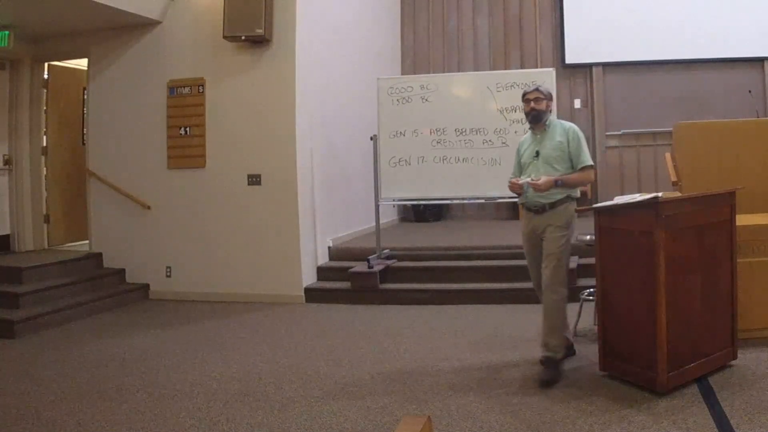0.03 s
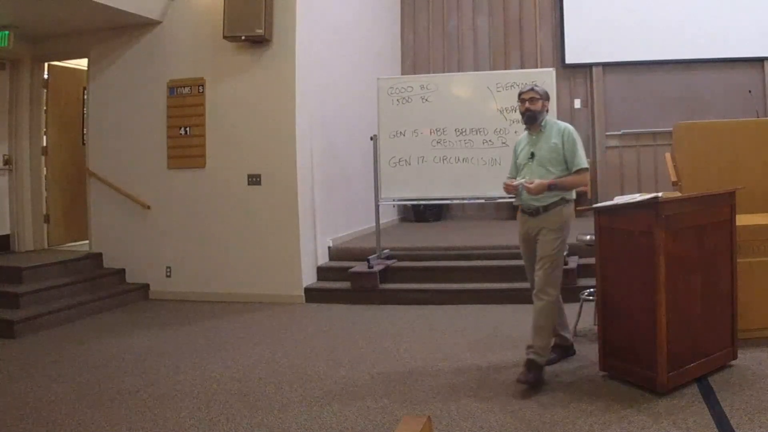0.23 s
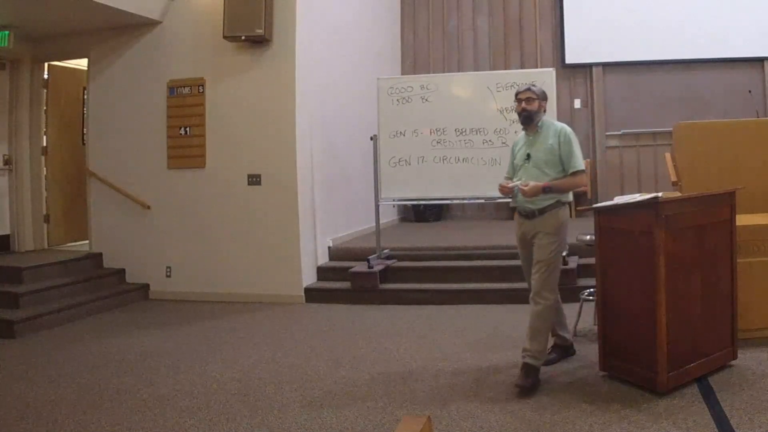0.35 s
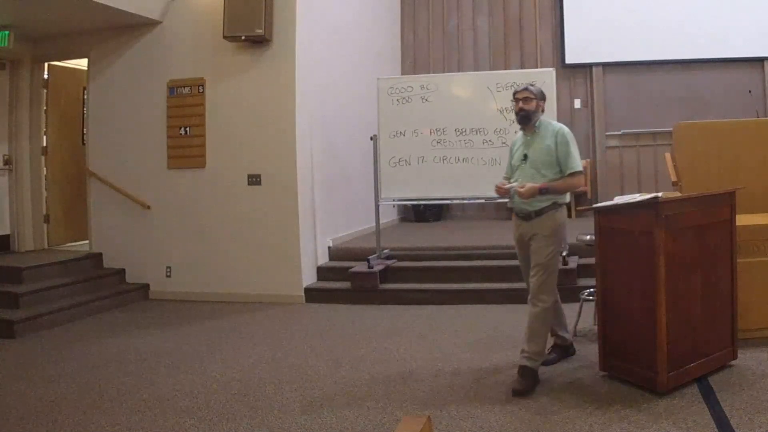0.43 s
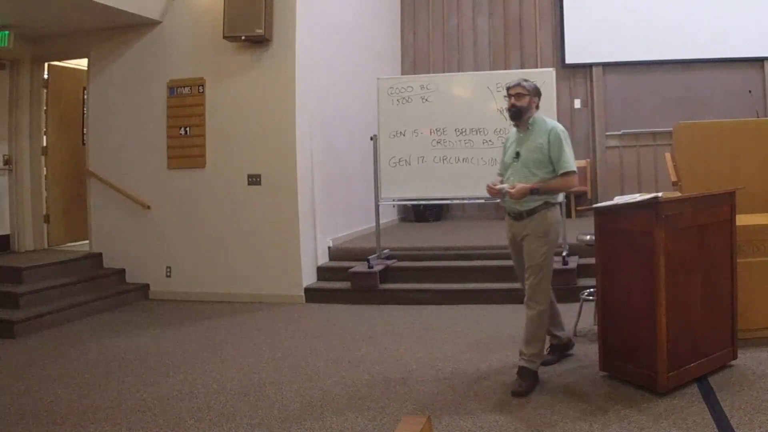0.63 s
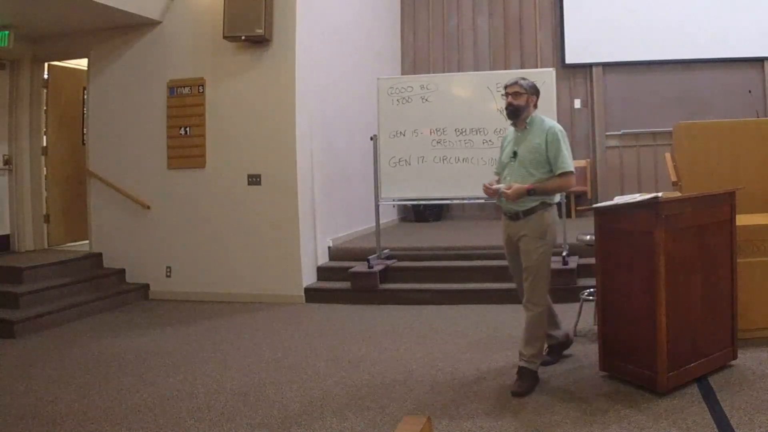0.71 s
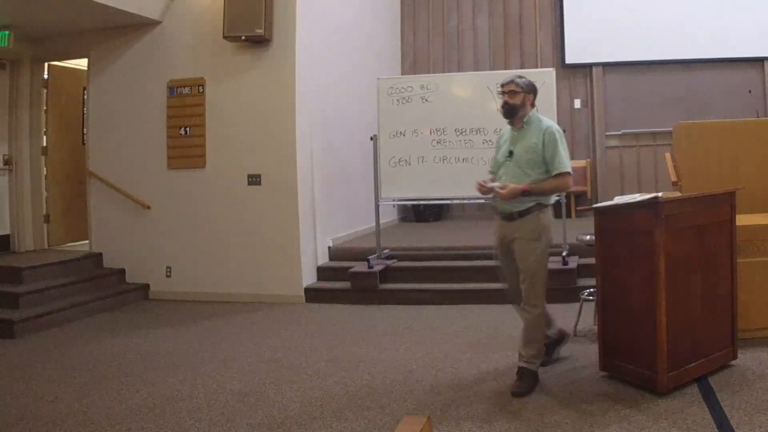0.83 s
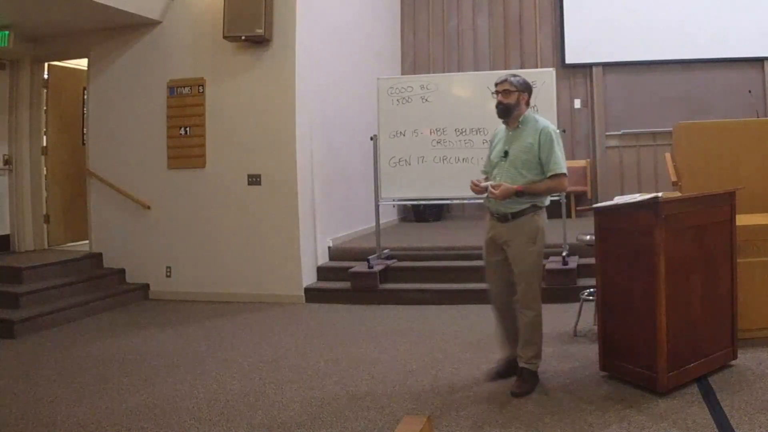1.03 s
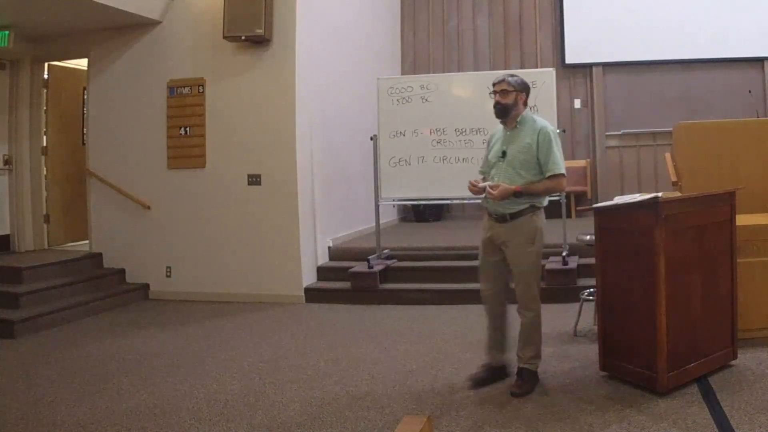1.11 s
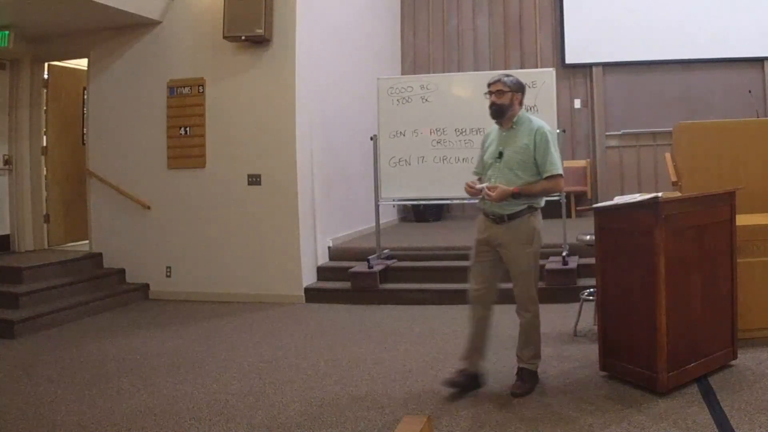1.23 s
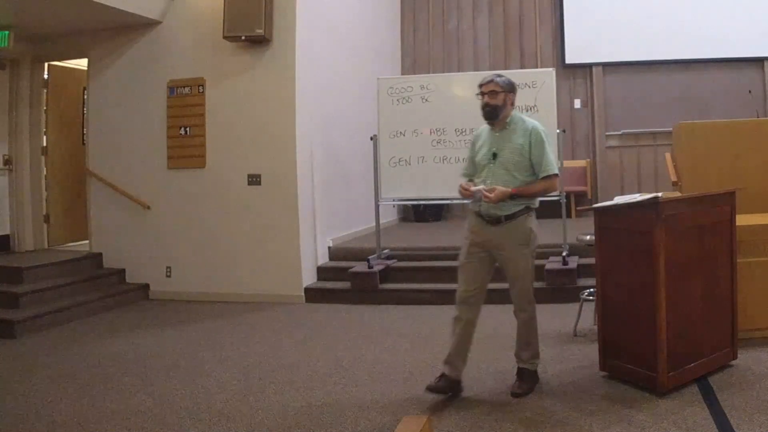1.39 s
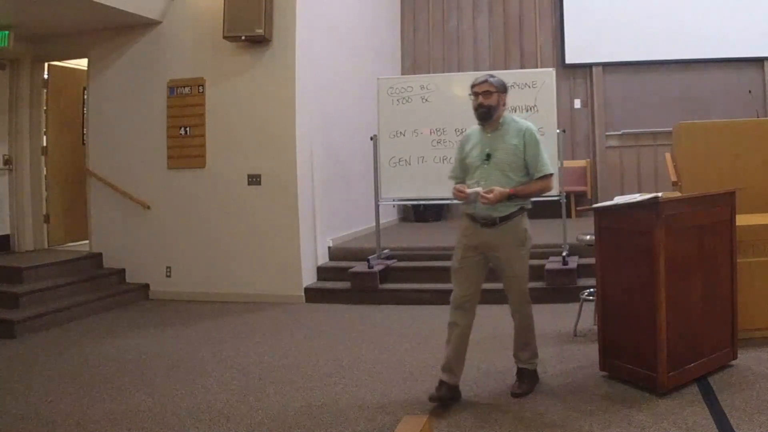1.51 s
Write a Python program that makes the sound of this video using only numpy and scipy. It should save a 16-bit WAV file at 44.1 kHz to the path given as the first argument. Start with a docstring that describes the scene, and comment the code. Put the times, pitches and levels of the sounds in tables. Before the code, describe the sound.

A few slow, muffled footsteps on carpet, heard through a body-worn microphone.

```python
"""Slow footsteps of a man on the carpeted floor of a lecture hall, heard from a microphone on his shirt.
Each shift of weight drives the floor into a low boom. Each sole lands with a cushioned impact that
excites the damped modes of the boards, a muffled knock prolonged by the reverberation of the hall.
His clothes brush and tick faintly over the rumble of ventilation and the hiss of the microphone."""
import sys
import numpy as np
from scipy import signal
from scipy.fft import rfft, irfft
from scipy.io import wavfile

SR = 44100
rng = np.random.default_rng(int(sys.argv[2]) if len(sys.argv) > 2 else 0)


def dump(signal):
    """Clip the signal to [-1, 1] and save it as 16-bit WAV at the path in sys.argv[1]."""
    limited = np.clip(np.atleast_2d(signal).T, -1, 1)
    pcm = np.round(limited * 32767).astype(np.int16)
    wavfile.write(sys.argv[1], SR, pcm)


N = 68355
T = np.arange(N) / SR


def from_db(db):
    """The decibel scale: 20 dB is a factor of ten in amplitude."""
    return 10 ** (np.asarray(db) / 20)


def unit_rms(x):
    """Normalisation to a mean square of one."""
    return x / np.sqrt(np.mean(x ** 2) + 1e-20)


def coloured_noise(spectrum):
    """Spectral shaping: white noise is weighted by a (frequency, level) curve and set to unit rms."""
    hz, db = np.transpose(spectrum)
    bin_hz = np.maximum(np.arange(N + 1) * SR / (2 * N), 1)
    gain = from_db(np.interp(np.log(bin_hz), np.log(hz), db))
    low_cut = bin_hz ** 2 / (bin_hz ** 2 + 10 ** 2)   # corner at 10 Hz
    return unit_rms(irfft(rfft(rng.standard_normal(2 * N)) * gain * low_cut)[:N])


# Hiss spectrum: (frequency [Hz], relative spectral density [dB])
HISS_SPECTRUM = [(1000, 10.5), (3000, 4.5), (6000, 2.5), (12500, 0), (13200, -15), (15800, -22)]
# Electrical tones: (frequency [Hz], rms level [dB])
WHINE_TONES = [(2220, -108), (2821, -104), (3181, -104)]
def microphone_noise(hiss_db=-82):
    """Electrical self-noise: a broadband hiss with faint pure tones."""
    whine = sum(from_db(db) * np.sqrt(2) * np.sin(2 * np.pi * hz * T) for hz, db in WHINE_TONES)
    return from_db(hiss_db) * coloured_noise(HISS_SPECTRUM) + whine


# Ventilation spectrum: (frequency [Hz], relative spectral density [dB])
VENTILATION_SPECTRUM = [(20, -13.5), (30, -7), (48, 0), (80, -3.5), (115, -13.5), (175, -16.5),
                        (240, -27.5), (320, -27.5), (400, -30.5), (600, -32), (900, -34), (1300, -42),
                        (2200, -54.5), (4000, -68.5)]
def ventilation(level_db=-57.5):
    """Stationary noise: moving air rumbles, with most of its power at low frequencies."""
    return from_db(level_db) * coloured_noise(VENTILATION_SPECTRUM)


def hall_reverberation(source, t60_s=0.35, gain_db=-15.5):
    """Diffuse reverberation: convolution with dense reflections that decay exponentially."""
    tail = rng.standard_normal(N) * from_db(-60 * T / t60_s)
    return from_db(gain_db) * signal.fftconvolve(source, tail / np.linalg.norm(tail))[:N]


# Rustle envelope: (time [s], level [dB])
RUSTLE_ENVELOPE = [(0, -67), (.3, -64.5), (.55, -68), (.72, -79), (1.55, -70)]
# Rustle spectrum: (frequency [Hz], relative spectral density [dB])
RUSTLE_SPECTRUM = [(50, -36), (90, 7.5), (160, 0.5), (300, -4), (420, -13.5), (900, -51)]
def body_rustle():
    """Amplitude modulation: a low noise rises and falls as the body moves."""
    level_db = np.interp(T, *np.transpose(RUSTLE_ENVELOPE))
    return from_db(level_db) * coloured_noise(RUSTLE_SPECTRUM)


# Cloth spectrum: (frequency [Hz], relative spectral density [dB])
CLOTH_SPECTRUM = [(1000, -3.5), (2200, -3), (4500, -2.5), (8000, -1.5), (12000, -1.5), (15500, 1)]
# Brush strokes: (peak time [s], level [dB], 1/e half-width [s], tilt [dB/octave])
BRUSH_STROKES = [(0.344, -84.5, 0.046, 1), (1.097, -81, 0.068, -3), (1.274, -83.5, 0.19, -5),
                 (1.405, -81.5, 0.091, 6.5)]
def cloth_brushes():
    """Sliding friction: cloth gives a swell of noise as a leg swings."""
    out = np.zeros(N)
    lowest_hz = CLOTH_SPECTRUM[0][0]
    for peak_s, db, half_width_s, tilt in BRUSH_STROKES:
        spectrum = [(hz, level + tilt * np.log2(hz / lowest_hz)) for hz, level in CLOTH_SPECTRUM]
        envelope = np.exp(-((T - peak_s) / half_width_s) ** 2)
        out += from_db(db) * envelope * coloured_noise(spectrum)
    return out


# Ticks of clothing: (time [s], level [dB], centre frequency [Hz])
CLOTH_TICKS = [(0.351, -80, 2400), (0.467, -75, 3620), (0.467, -75.5, 6200), (1.1, -71, 7500),
               (1.2699, -70.5, 5550), (1.273, -70, 5860), (1.271, -78, 9900)]
def cloth_ticks(decay_s=0.0012, q=3.6):
    """Band-limited transients: each tick is a burst of noise with an exponential decay."""
    out = np.zeros(N)
    for onset_s, db, hz in CLOTH_TICKS:
        edges_hz = [hz * (1 - .5 / q), hz * (1 + .5 / q)]
        bandpass = signal.butter(2, edges_hz, "band", fs=SR, output="sos")
        grain = unit_rms(signal.sosfilt(bandpass, rng.standard_normal(N)))
        envelope = (T >= onset_s) * np.exp(-np.abs(T - onset_s) / decay_s)
        out += from_db(db) * envelope * grain
    return out


def damped_mode(force, hz, t60_s):
    """A damped harmonic oscillator: a unit impulse starts a decaying sine of amplitude one."""
    radius = from_db(-60 / (t60_s * SR))
    angle = 2 * np.pi * hz / SR
    return signal.lfilter([0, np.sin(angle)], [1, -2 * radius * np.cos(angle), radius ** 2], force + 1e-18)


# Modes of the boards under the carpet: (frequency [Hz], gain [dB], T60 [s])
BOARD_MODES = [(85.4, -5, 0.3), (135, -10, 0.11), (159.3, -3.5, 0.079), (184, -9.5, .4), (285.5, -21, 0.1),
               (321, -7.5, .12), (472, -12, 0.15)]
# Impacts: (time [s], board drive [dB], contact time [s], heel drive [dB], heel frequency [Hz])
SOLE_IMPACTS = [(0.197, -56, 0.0031, -47, 265), (0.292, -61.5, 0.002, -56.5, 264),
                (0.307, -59, 0.0022, -53.5, 293), (0.416, -41, 0.0072, -67, 245),
                (.432, -45, 0.0063, -63, 245), (0.489, -42, 0.0074, -80, 246), (.587, -47, .0062, -45, 228),
                (.59, -52.5, 0.0025, -45, 258), (.885, -57, 0.0031, -48.5, 310),
                (0.903, -42, 0.0034, -55, 327), (0.936, -64, 0.0026, -53.5, 324),
                (1.037, -68, 0.0031, -54, 312), (1.2, -62.5, 0.002, -61.5, 290)]
def sole_knocks(heel_t60_s=0.034):
    """Impact excitation: a cushioned pulse rings boards and heel; longer contact gives less treble."""
    board_force, heels = np.zeros((2, N))
    for onset_s, board_db, contact_s, heel_db, heel_hz in SOLE_IMPACTS:
        pulse = np.sin(np.pi * np.clip((T - onset_s) / contact_s, 0, 1)) ** 2
        push = -pulse / pulse.sum()   # unit impulse, downward
        board_force += from_db(board_db) * push
        heels += from_db(heel_db) * damped_mode(push, heel_hz, heel_t60_s)
    boards = sum(from_db(db) * damped_mode(board_force, hz, t60_s) for hz, db, t60_s in BOARD_MODES)
    return heels + boards


# Floor booms, some followed by a weaker swell about 60 ms later: (peak time [s], level [dB], frequency [Hz],
# swell [s], fade [s])
FLOOR_LOADS = [(0.02, -43, 49.6, 0.015, 0.019), (0.086, -45.5, 48.5, 0.034, 0.042),
               (0.153, -49.5, 47, .02, 0.015), (0.223, -43.5, 43.7, 0.032, 0.022),
               (.274, -46, 46.6, 0.004, 0.021), (.386, -40, 42.7, 0.015, 0.019),
               (.457, -27, 46.3, 0.023, .027), (0.508, -33.5, 47.5, 0.0054, 0.034),
               (0.553, -40, 42.3, .018, 0.017), (0.596, -45.5, 64, 0.011, 0.015),
               (0.624, -29.7, 44.6, 0.0094, 0.019), (0.667, -37.5, 35.5, 0.004, 0.036),
               (0.916, -43.5, 53, 0.0063, 0.021), (0.956, -44.5, 45.9, 0.041, 0.051),
               (1.022, -42.5, 48.6, 0.0056, 0.047), (1.095, -47, 51.5, 0.022, 0.011),
               (1.206, -48, 51.4, 0.008, 0.017), (1.481, -44, 56.5, .012, 0.014)]
def floor_booms(overtone_ratio=1.6, overtone_db=-22):
    """Flexural vibration: in each boom two floor modes swell for a few cycles and fade; some booms are followed
    by a weaker swell."""
    out = np.zeros(N)
    for peak_s, db, hz, swell_s, fade_s in FLOOR_LOADS:
        from_peak_s = T - peak_s
        width_s = np.where(from_peak_s < 0, swell_s, fade_s)
        envelope = np.exp(-(from_peak_s / width_s) ** 2)
        phase = 2 * np.pi * hz * from_peak_s
        modes = np.cos(phase) + from_db(overtone_db) * np.cos(overtone_ratio * phase)
        out += from_db(db) * envelope * modes
    return out


def scene():
    """Superposition: steps, clothes and ventilation add in one channel; only the knocks reverberate."""
    knocks = sole_knocks()
    steps = floor_booms() + knocks + hall_reverberation(knocks)
    clothes = body_rustle() + cloth_brushes() + cloth_ticks()
    return (steps + clothes + ventilation())[None]


def record(dry):
    """Band limiting: the sound and the microphone's self-noise pass through a steep low-pass filter."""
    cutoff_hz = 15800
    lowpass = signal.ellip(10, .1, 70, cutoff_hz, fs=SR, output="sos")
    return signal.sosfilt(lowpass, dry + microphone_noise())


dry = scene()
out = record(dry)
dump(out)
```